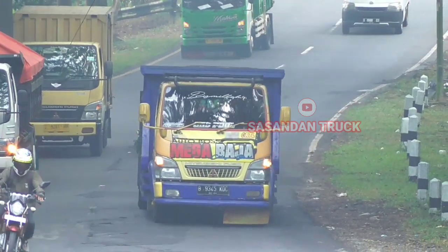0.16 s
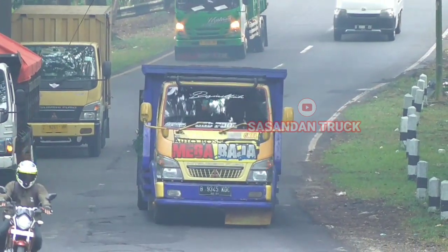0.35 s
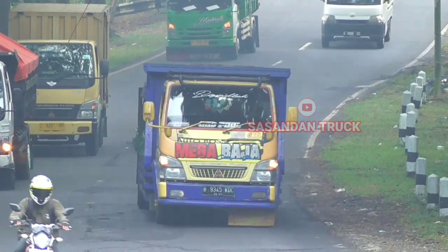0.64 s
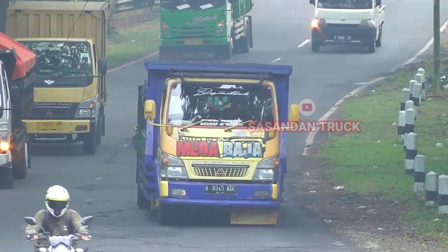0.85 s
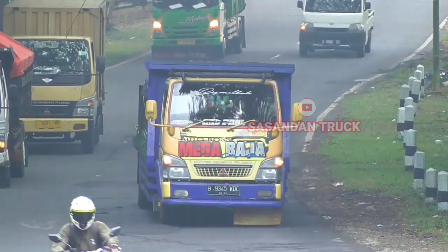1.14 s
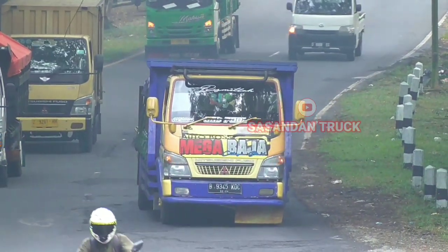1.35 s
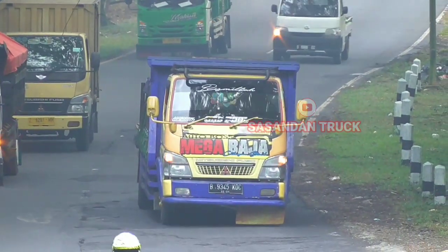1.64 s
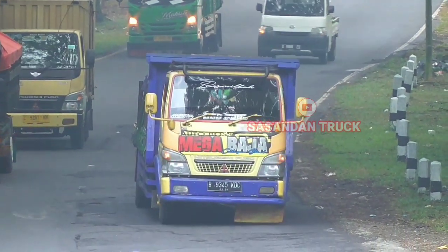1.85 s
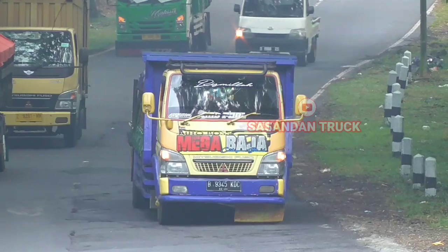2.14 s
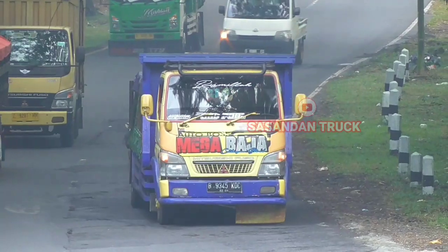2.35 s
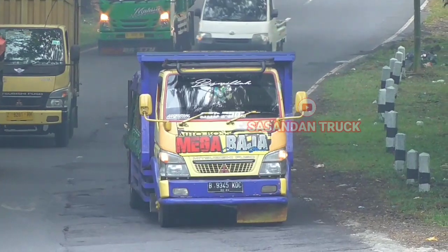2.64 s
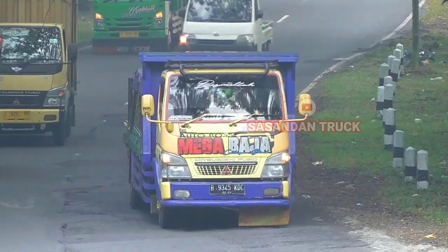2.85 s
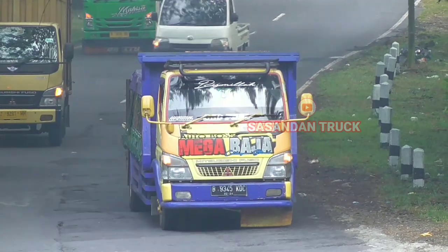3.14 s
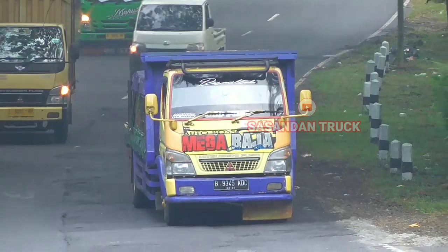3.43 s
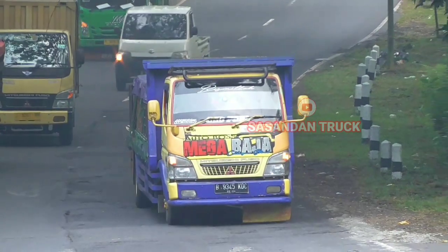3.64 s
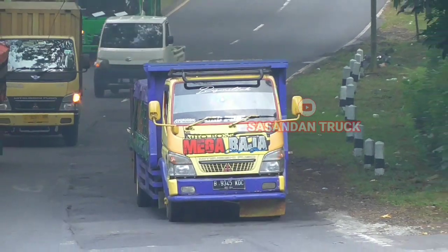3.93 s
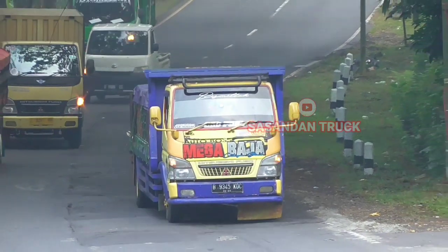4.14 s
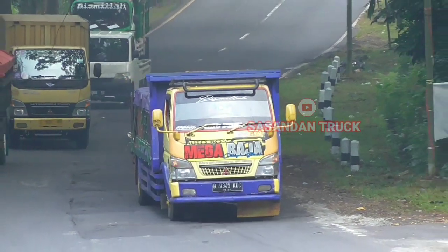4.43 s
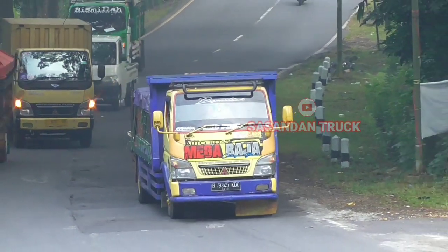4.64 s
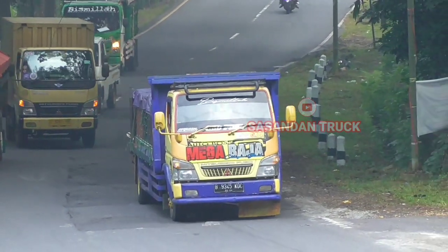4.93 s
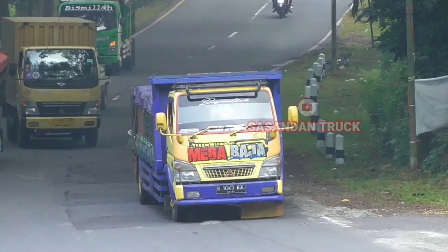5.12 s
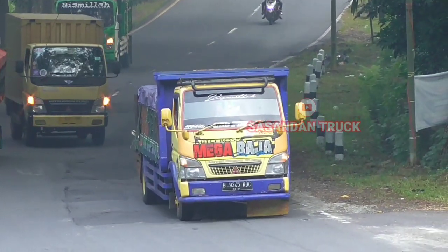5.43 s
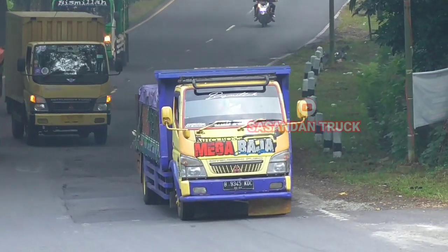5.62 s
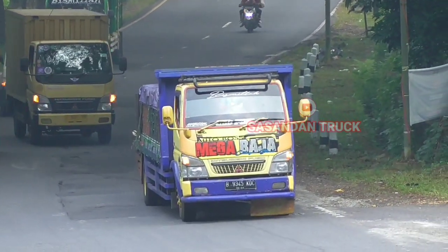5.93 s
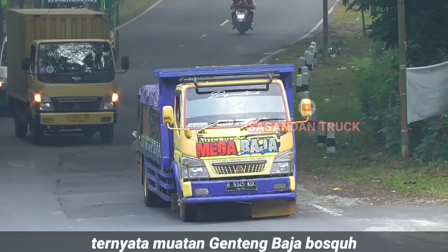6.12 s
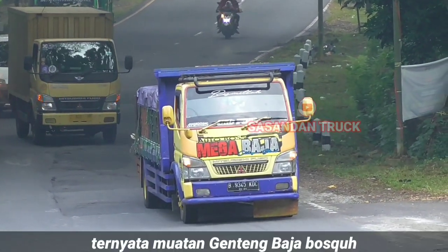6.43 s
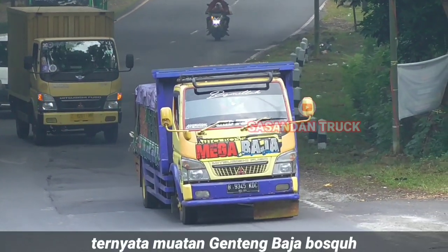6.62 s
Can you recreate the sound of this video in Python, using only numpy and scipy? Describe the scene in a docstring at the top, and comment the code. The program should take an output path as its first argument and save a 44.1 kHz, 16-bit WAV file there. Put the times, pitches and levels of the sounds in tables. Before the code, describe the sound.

Rising diesel drone and clatter from an approaching dump truck, a brief dip at the gear change, then a deep, close, straining growl.

```python
"""A loaded four-cylinder diesel dump truck climbs a hill road, shifts up a gear and labours on, lower and louder.
Additive synthesis at multiples of the firing rate makes its exhaust note and the singing upper harmonics.
Clicks and surging noise at each firing excite the silencer, block and panels; filtered noise makes rasp and hiss.
A motorbike (resonant noise) coasts by at the start; other lorries rumble behind (coloured noise and a drone).
In the roadside trees cicadas sing (resonant noise), and a cricket whines (an amplitude-modulated tone)."""
import sys
import numpy as np
from scipy import signal
from scipy.fft import rfft, irfft, next_fast_len
from scipy.io import wavfile
from scipy.ndimage import uniform_filter1d

SR = 44100
rng = np.random.default_rng(int(sys.argv[2]) if len(sys.argv) > 2 else 0)


def put_to_file(sound):
    """Save the sound as 16-bit audio at rate SR, in the file named by the first command-line argument."""
    columns = np.atleast_2d(sound).T  # one column per channel
    safe = np.clip(columns, -1, 1)
    whole_steps = np.round(safe * 32767)
    wavfile.write(sys.argv[1], SR, whole_steps.astype(np.int16))


N = 298557
TIME = np.arange(N) / SR  # s
SIZE = 2 * next_fast_len(N // 2 + 2048)  # transform length, samples
BINS = np.fft.rfftfreq(SIZE, 1 / SR)  # Hz
SIDES = np.array([[.5], [-.5]])  # halves of a left minus right difference

# closing of the throttle for the gear change: (time [s], closure [0-1])
THROTTLE_SHUT = [(3.46, 0), (3.48, 0.37), (4.15, 1), (4.26, 0.13)]


def undb(db):
    """Amplitude ratio: 20 dB is a factor of ten."""
    return 10 ** (np.asarray(db) / 20)


def curves(table):
    """Linear interpolation: each column of a table joined by straight lines in time."""
    s, *columns = np.transpose(table)
    return [np.interp(TIME, s, c) for c in columns]


def across(points):
    """Logarithmic interpolation: (Hz, value) points joined on a log-frequency axis."""
    hz, value = np.transpose(points)
    return np.interp(np.log(BINS + 1), np.log(hz), value)


def unit(x):
    """Normalization to a root-mean-square value of 1."""
    return x / np.sqrt(np.mean(x ** 2))


def through(x, response):
    """Linear filtering: the spectrum times a frequency response, then scaled to rms 1."""
    return unit(irfft(rfft(x, SIZE) * response, SIZE)[..., :N])


def resonance(hz, width):
    """Damped oscillator: a band-pass response of gain 1 at its centre."""
    return 1j * BINS * width / (hz ** 2 - BINS ** 2 + 1j * BINS * width)


def swell(s, length):
    """Gaussian envelope: a smooth rise and fall around time s, of standard deviation length."""
    return np.exp(-.5 * ((TIME - s) / length) ** 2)


def walk(rate):
    """Low-passed random steps: levels held 1 / rate s and averaged twice; rms 1."""
    hold = int(SR / rate)
    steps = rng.standard_normal(1024)[np.arange(N) // hold % 1024]
    return unit(uniform_filter1d(uniform_filter1d(steps, hold), hold))


def air(side_db):
    """Mid-side stereo: white noise, its side signal at the given level against the mid."""
    mid, side = rng.standard_normal((2, N))
    return unit(mid + undb(side_db) * side * np.array([[1], [-1]]))


def pan(x, db):
    """Interaural level difference: place a sound by its left minus right level."""
    return x * undb(SIDES * db)


def roadside(x, wet_db, t60):
    """Scattering from trees and vehicles: a decaying noise tail, different in each channel."""
    t = TIME[:SR // 2]
    tail = rng.standard_normal((2, len(t))) * undb(-60 * t / t60) * (t > .004)
    tail /= np.sqrt(np.sum(tail ** 2, axis=1, keepdims=True))
    return x + undb(wet_db) * signal.fftconvolve(x[None], tail, axes=1)[:, :N]


def knocks(cycle, jitter_s, scatter_db):
    """Impulse excitation: one click a firing, with random timing error and strength."""
    firing = np.arange(1, int(cycle[-1]))
    error, size = rng.standard_normal((len(firing), 2)).T
    at = np.clip((np.interp(firing, cycle, TIME) + jitter_s * error) * SR, 0, N - 2)
    whole, strength = at.astype(int), undb(scatter_db * size)
    # each click is shared between the two nearest samples
    first = np.bincount(whole, strength * (1 - at + whole), N)
    second = np.bincount(whole + 1, strength * (at - whole), N)
    return unit(first + second)


def puffs(cycle, depth, side_db):
    """Modulated turbulence: gas noise surges at each firing and decays until the next."""
    return unit(air(side_db) * (1 + depth * np.exp(-(cycle % 1))))


def flares(table, noise):
    """Resonant excitation: noise through two equal resonances in series rings in brief swells."""
    out = 0
    for s, length, hz, width, db in table:
        out = out + undb(db) * swell(s, length) * through(noise, resonance(hz, width) ** 2)
    return out


def exhaust(cycle, hz, db, bog):
    """Pipe resonance: harmonics of the firing rate swell and fade as the revs carry them across it."""
    # response of the exhaust pipe, relative: (frequency [Hz], gain [dB])
    pipe = [(107, 0), (110.5, -1.5), (113, -11), (122, 3), (130, -6), (138, 1.5), (152, 0), (166, 3.5),
            (180, -2), (195, 5), (207, -11), (222, -10.5), (231, 1), (252, 5.5), (275, -7), (285, -3.5),
            (303, -3.5), (330, -15), (352, -12.5), (385, -35), (425, -14), (455, -22.5), (495, -10),
            (540, -23.5)]
    # changes of harmonics 2 to 7 as the engine bogs down, where the even ones take over: (change [dB])
    bog_db = [1, -0.5, 10, -1.5, 11, 6]
    # relative weights of harmonics 2 to 7 with the throttle shut: (weight [dB])
    coast_db = [0, 0, 4.5, -5, -11.5, -19]
    note_db = 0.46  # added to the given level
    shaken = cycle + .002 * walk(30)  # uneven burning
    shut, = curves(THROTTLE_SHUT)
    gains = []
    for order, (change, coast) in enumerate(zip(bog_db, coast_db), 2):
        driven_db = (1 - shut) * np.interp(order * hz, *np.transpose(pipe))
        fading_db = 1.7 * walk(9)  # each harmonic fades on its own
        gains.append(undb(driven_db + shut * coast + bog * change + fading_db))
    gains = gains / np.linalg.norm(gains, axis=0) * undb(db + note_db)
    fundamental_db = np.interp(TIME, [3.5, 5, 6.2], [-58, -53, -47])
    # the open pipe radiates the rate of change of its flow: each crest is followed by a trough
    note = -undb(fundamental_db) * np.sin(2 * np.pi * shaken)
    for order, gain in enumerate(gains, 2):
        lag = 1.1 * (order % 2)  # the piston's push follows each blow-down and turns the odd harmonics
        paths = .12 * walk(2)  # the road's reflection slowly turns each harmonic, radians
        note = note - gain * np.sin(2 * np.pi * order * shaken - lag + paths)
    # strokes scatter in strength, more with the throttle shut
    uneven_db = (0.45 + 0.7 * shut) * walk(70)
    # every other firing is stronger, more so when the engine bogs down
    cylinder_db = (-0.3 - 0.6 * bog) * np.cos(np.pi * cycle)
    return np.sqrt(2) * note * undb(uneven_db + cylinder_db)


def chuffs():
    """Resonance of turbulent flow: short, low gusts as the throttle shuts and the clutch bites."""
    # gusts: (peak time [s], level [dB], length [s], pitch [Hz], width of each of two resonances [Hz])
    gusts = [(3.457, -24, 0.011, 215, 200), (3.505, -31, 0.022, 195, 80), (3.816, -32, 0.014, 281, 150),
             (3.89, -28, 0.022, 160, 90)]
    out = 0
    for s, db, length, hz, width in gusts:
        gust = through(rng.standard_normal(N), resonance(hz, width) ** 2)
        out = out + undb(db) * gust * swell(s, length)
    return out


def shell(cycle, db):
    """Forced vibration: the silencer shell booms with every firing."""
    # relative response of the shell: (frequency [Hz], gain [dB])
    shell_colour = [(300, -6), (380, 24), (435, 18), (500, 8), (560, 22), (640, 20.5), (760, -44)]
    blows = roadside(knocks(cycle, jitter_s=.0001, scatter_db=1.5), wet_db=-6, t60=.25)
    drive = blows + puffs(cycle, depth=2.6, side_db=-11)
    return undb(db) * through(drive, undb(across(shell_colour)))


def block():
    """Modal superposition: the resonances of block and cab add with alternating sign."""
    # modes of the block and cab: (frequency [Hz], width [Hz], gain [dB])
    modes = [(770, 45, -5), (855, 26.5, 0.5), (877, 69, -3), (1056, 111, -3.5), (1282, 122, -6.5),
             (1506, 79, -9.5), (1629, 49, -12)]
    response = 0
    for k, (hz, width, gain) in enumerate(modes):
        response = response + (-1) ** k * undb(gain) * resonance(hz, width)
    return response


def clatter(cycle, db):
    """Modal excitation: combustion knocks and rattling gear ring the block."""
    blows = roadside(knocks(cycle, jitter_s=.00009, scatter_db=4.0), wet_db=-0.5, t60=0.1)
    drive = undb(-7.5) * blows + puffs(cycle, depth=1.8, side_db=-22)
    return undb(db) * through(drive, block())


def panels(cycle):
    """Sympathetic resonance: panels of the tipper body ring as the engine shakes them."""
    # ringing panels: (peak time [s], length [s], frequency [Hz], width of each of two resonances [Hz],
    # level [dB])
    ringing = [(2.99, 0.024, 1067, 110, -29.5), (3.3, 0.065, 864, 60, -35), (3.28, 0.11, 1626, 110, -38.5),
               (4.38, 0.13, 832, 60, -33), (5, 0.027, 733, 80, -32), (5.03, 0.16, 762, 80, -33.5),
               (5.06, 0.16, 1472, 69.9, -36), (5.25, 0.043, 1130, 80, -31), (5.47, 0.034, 755, 49.9, -31),
               (5.98, 0.12, 1426, 130, -38)]
    return flares(ringing, puffs(cycle, depth=3, side_db=-24))


def singing(cycle, hz, db, bog):
    """Harmonic synthesis: clean lines at high revs, a growl at low revs whose high lines break up."""
    # upper harmonics that engine and gears favour, relative: (multiple of the firing rate [1],
    # level at high revs before a common lift [dB], level at low revs [dB])
    orders = [(8, -25, -15), (9, -20, -21), (10, -21, -19), (11, -18, -21), (12, -21, -22),
              (13, -18, -15.5), (14, -15, -12), (15, -20, -16), (17, -20, -22), (18, -21, -23),
              (20, -24, -21), (21, -19, -22), (22, -22, -27), (26, -36, -22), (27, -30, -15),
              (28, -32, -22)]
    # harmonics that sing out for a while: (multiple [1], peak time [s], length [s], lift [dB])
    lifts = [(14, 1.9, .55, 8), (9, 1.8, .55, 9), (12, 1.75, .22, 9), (17, 1.8, .4, 4), (18, 1.8, .5, 5),
             (10, 3, .3, 11), (11, 3.3, .15, 7), (10, 4.3, .17, 8), (15, 4.4, .2, 6), (9, 4.5, .22, 12),
             (8, 4.45, .15, 6), (10, 6.3, .3, 5), (13, 6.3, .4, 4), (14, 6.4, .4, 3)]
    high_revs_db = 1.5  # the common lift
    labour = np.interp(hz, [57, 70], [1, 0])
    breakup = 0.015 + labour * (0.1 - 0.015)  # roughness that each step up the harmonics adds
    shut, = curves(THROTTLE_SHUT)
    tones = 0
    for order, high_db, low_db in orders:
        rough = breakup * (order - 4)
        rate = 12 + 2 * order
        turn = 2 * np.pi * order * cycle
        broken = walk(rate) * np.cos(turn) + walk(rate) * np.sin(turn)
        tone = (np.cos(turn) + rough * broken) / np.sqrt(.5 + rough ** 2)
        lift_db = sum(lift * swell(s, length) for multiple, s, length, lift in lifts if multiple == order)
        revs_db = (1 - labour) * (high_db + high_revs_db) + labour * low_db
        fade_db = 1.6 * walk(6)  # each harmonic comes and goes
        tones = tones + tone * undb(revs_db + lift_db + fade_db)
    # stronger as the engine bogs down, weaker with the throttle shut
    return roadside(tones * undb(db + 2 * bog - 1.5 * shut), wet_db=-14, t60=0.2)


def gas(cycle, rush_db, bog):
    """Flow noise: the tailpipe's rasp, the intake's hollow ring and the hiss of charge air."""
    # relative colour of the rasp: (frequency [Hz], gain [dB])
    rasp_colour = [(1200, 0), (1900, 5.5), (2300, 3.5), (2750, 2.5), (3450, 1.5), (4400, 2.5), (5300, -1),
                   (6100, -10.5), (8000, -23)]
    # relative colour of the hiss from afar: (frequency [Hz], gain [dB])
    hiss_far = [(4000, 5), (6100, 9), (6700, 12.5), (7400, 12), (8400, 14), (9400, 12.5), (10600, 11),
                (12000, 7), (13500, 5), (15000, -23)]
    # relative colour of the hiss once the truck is near and under load: (frequency [Hz], gain [dB])
    hiss_near = [(3500, -27), (5200, 3), (6100, 4.5), (6850, 6), (7600, 5), (8400, 7), (9500, 3),
                 (11000, 2), (13000, -4.5), (15000, -19)]
    rasp = through(puffs(cycle, depth=0.25, side_db=-7), undb(across(rasp_colour)))
    jet = puffs(cycle, depth=0.7, side_db=-4.5)
    intake = undb(-9.5) * through(jet, resonance(3460, 980) ** 2)  # level against the rasp
    near = np.interp(TIME, [3.8, 4.3], [0, 1])
    far_hiss = through(jet, undb(across(hiss_far)))
    near_hiss = through(jet, undb(across(hiss_near)))
    hiss = (1 - near) * far_hiss + near * near_hiss
    # the hiss is brightest as the truck comes close
    sizzle = undb(-46) * swell(5, 0.4) * through(jet, resonance(13200, 12000) ** 2)
    flutter_db = .55 * walk(16)
    # the rasp grows more slowly than the hiss (dB per dB) and eases as the engine bogs down
    rasp_db = -4 + 0.73 * rush_db - 1.5 * bog
    rasping = undb(rasp_db) * (rasp + (1 - bog) * intake)
    hissing = undb(rush_db + 7) * hiss
    return undb(flutter_db) * (rasping + hissing + sizzle)


def turbo():
    """Frequency modulation: the turbocharger's thin whistle wavers and climbs, then sinks into the rush."""
    # whistle before its random waver: (time [s], frequency [Hz], level [dB])
    whistle = [(0, 2900, -67), (0.3, 2960, -61), (0.72, 3020, -62), (1.0, 3000, -66), (1.45, 3043, -57),
               (1.8, 3070, -60), (2.25, 3130, -57), (2.8, 3194, -73)]
    hz, db = curves(whistle)
    waver_hz, flicker_db = 34 * walk(45), 3.5 * walk(12)
    tone = np.sin(2 * np.pi * np.cumsum(hz + waver_hz) / SR)
    return undb(db) * unit(roadside(tone * undb(flicker_db), wet_db=-4, t60=0.11))


def whistles():
    """Narrow-band resonance: whistles of intake and charge air flare up."""
    # flares: (peak time [s], length [s], frequency [Hz], width of each of two resonances [Hz], level [dB])
    whistling = [(.62, 0.2, 3320, 110, -56), (1.2, 0.2, 3470, 110, -65), (1.9, 0.13, 3320, 130, -51),
                 (2.0, 0.22, 4460, 90, -55), (2.45, 0.3, 4320, 450, -51), (3.05, 0.06, 3600, 400, -42),
                 (3.46, 0.014, 8720, 220, -44), (3.652, 0.018, 10370, 110, -40.5),
                 (4.322, 0.036, 8400, 429, -37.5), (4.45, 0.25, 1900, 600, -38.5),
                 (4.9, 0.36, 6970, 419.4, -40.5)]
    return flares(whistling, air(side_db=-18))


def spread(x):
    """Decorrelation: near the truck, shifting paths from along its length widen the image."""
    # width of the truck's noise: (time [s], added side against mid [dB])
    width_table = [(0, -18), (3.5, -37), (4.6, -16), (5.2, -4), (5.6, -4), (6.2, -4.5), (6.77, -8)]
    side_db, = curves(width_table)
    mid = rfft(x.mean(axis=0), SIZE)
    side = 0
    for delay in rng.uniform(.001, .009, 6):  # s
        delayed = irfft(mid * np.exp(-2j * np.pi * BINS * delay), SIZE)[:N]
        side = side + walk(14) * delayed / np.sqrt(6)
    return x + undb(side_db) * side * np.array([[1], [-1]])


def draw_level(x):
    """Interaural phase difference: close by, the truck reaches the left channel sooner."""
    # the truck draws level with the microphone: (time [s], closeness [0-1])
    closeness = [(3.4, 0), (4.6, 0.52), (5.4, 0.94)]
    # lead of the left channel in the close signal: (frequency [Hz], phase [rad])
    near_lead = [(50, 0.2), (130, 0.44), (270, 0.48), (500, 0.88), (900, 0.55), (1500, 0.85), (3500, 1.1),
                 (8000, 1.27), (14000, 1.7)]
    near, = curves(closeness)
    shift = np.exp(1j * SIDES * across(near_lead))
    early_left = irfft(rfft(x, SIZE) * shift, SIZE)[:, :N]
    return (1 - near) * x + near * early_left


def motorbike():
    """Resonant noise: a motorbike coasts downhill at the start with a soft rasp."""
    return undb(-49.5) * swell(0.31, 0.98) * through(air(side_db=-44), resonance(1940, 580) ** 2)


def traffic():
    """Filtered noise plus a frequency-modulated tone: the queue's rumble and a lorry that drops back."""
    # the queue's rumble: (time [s], level [dB])
    rumble_level = [(0, -31.5), (3.3, -32.5), (4.4, -32), (5.2, -34.5), (6.0, -29), (6.77, -32.5)]
    # relative colour of the rumble: (frequency [Hz], gain [dB])
    traffic_colour = [(20, -36), (35, -40), (48, -16), (85, -15.5), (125, -8), (165, -2), (200, -7),
                      (245, -4.5), (310, -6.5), (390, -15.5), (900, -11.5), (3000, -82)]
    rumble_db, = curves(rumble_level)
    rumble = through(air(side_db=-17.5), undb(across(traffic_colour))) * undb(rumble_db)
    drone_hz = 122 * (1 + 0.01146 * walk(3.0))
    waver_db = 3.5 * walk(5)
    drone_db = np.interp(TIME, [0, 3, 5], [-43, -45, -52]) + waver_db
    drone = np.sqrt(2) * undb(drone_db) * np.sin(2 * np.pi * np.cumsum(drone_hz) / SR)
    return rumble + drone


def insects():
    """Amplitude modulation: wing strokes put side tones on a cricket's whine over a cicada chorus."""
    # the bush cricket's whine before its random waver: (time [s], frequency [Hz])
    cricket = [(0, 13900), (.7, 13820), (1.45, 14010), (2.55, 13790), (3.35, 14020), (4.4, 13800),
               (5.3, 14000), (6.3, 13820), (6.77, 13920)]
    chorus = through(air(side_db=-7.5), resonance(7870, 870) ** 2) * undb(-47.0 + .5 * walk(3.7))
    hz, = curves(cricket)
    stroke_hz = 235 + 8 * walk(9)
    strokes = 1 + 0.43 * np.cos(2 * np.pi * np.cumsum(stroke_hz) / SR)
    whine = strokes * np.sin(2 * np.pi * np.cumsum(hz + 18 * walk(120)) / SR)
    return pan(chorus, db=2.5) + undb(-54.0) * unit(roadside(whine, wet_db=18, t60=0.25))


def scene():
    """Superposition: one firing cycle drives all the engine's sounds; traffic and insects add to them."""
    # engine speed, with the gear change from 3.43 to 4.1 s: (time [s], firing rate [Hz])
    firing_rate = [(0.0, 68), (0.54, 69.4), (0.85, 70.9), (1.3, 72.1), (2.0, 74.2), (2.6, 76.4),
                   (2.85, 76.95), (3.05, 76.7), (3.38, 77.3), (3.44, 76), (3.475, 72.3), (3.6, 69.3),
                   (3.7, 66.06), (3.9, 58.7), (4.08, 57.7), (4.2, 56.25), (4.35, 56.15), (4.6, 55.55),
                   (4.9, 54.85), (5.05, 54.25), (5.25, 54.35), (5.6, 53.55), (6.1, 53.1), (6.3, 53.45),
                   (6.42, 53.2), (6.6, 54), (6.77, 53.5)]
    # exhaust note at the verge: (time [s], level before a small trim [dB])
    loudness = [(0.0, -31.5), (1.19, -29), (1.87, -26), (2.36, -28.5), (2.47, -25), (3.24, -22.5),
                (3.44, -21.5), (3.475, -28), (3.55, -27), (3.61, -24), (3.68, -26), (3.77, -23), (3.9, -26),
                (3.95, -30.5), (4.13, -22), (4.2, -20.5), (4.3, -17), (4.73, -16.5), (4.84, -18.5),
                (4.96, -16.5), (5.5, -16.5), (5.75, -19), (5.93, -16.5), (6.2, -18), (6.43, -22.5),
                (6.56, -20.5), (6.77, -22.5)]
    # silencer's boom: (time [s], level before a trim [dB])
    boom = [(0.0, -48), (0.11, -64), (1.98, -42), (2.73, -54), (4.02, -42), (4.43, -34.5), (5.19, -42),
            (5.39, -36), (5.69, -41), (5.79, -36.5), (6.71, -27.5), (6.77, -27)]
    # engine effort, before trims: (time [s], combustion clatter [dB], rush of gas and air [dB])
    effort = [(0.0, -41, -58.5), (0.07, -37.5, -59.5), (1.26, -34.5, -57), (2.02, -31.5, -51.5),
              (2.32, -31.5, -52), (3.36, -27, -43.5), (3.6, -31.5, -47.5), (3.64, -29.5, -45.5),
              (3.9, -30, -46), (4.32, -27, -39), (4.73, -26.5, -39.5), (5.19, -27.5, -42),
              (5.71, -30, -42.5), (6.43, -31.5, -43.5), (6.62, -30.5, -49), (6.77, -32.5, -47.5)]
    # the truck's bearing: (time [s], left minus right [dB])
    bearing = [(0, -4), (3.5, -1.5), (4.5, -0.3), (5.15, 3.5), (5.6, 4), (6.2, 1), (6.77, 1)]
    hz, = curves(firing_rate)
    note_db, = curves(loudness)
    boom_db, = curves(boom)
    effort_db, rush_db = curves(effort)
    pan_db, = curves(bearing)
    cycle = np.cumsum(hz) / SR  # firings so far
    bog = np.clip((TIME - 5.38) / 0.65 + .5, 0, 1)  # the engine bogs down at its lowest revs
    note = roadside(exhaust(cycle, hz, note_db, bog) + chuffs(), wet_db=-21, t60=.12)
    knocking = shell(cycle, boom_db - 5.5) + clatter(cycle, effort_db - 3.5)
    engine = knocking + panels(cycle) + singing(cycle, hz, effort_db - 1.5, bog)
    rush = gas(cycle, rush_db, bog) + turbo() + whistles()
    # the deep note and the rush follow only a share of the truck's bearing
    placed_note = pan(note, -0.5 + 0.16 * pan_db)
    placed_noise = spread(pan(engine, pan_db) + pan(rush, 0.57 * pan_db))
    return draw_level(placed_note + placed_noise) + traffic() + motorbike() + insects()


def record(dry):
    """Transfer functions: the channels differ in gain and phase; a low-pass cuts the top."""
    # gain of the two microphone channels: (frequency [Hz], left minus right [dB])
    balance = [(30, -1), (60, 0), (110, -1.1), (200, 0.7), (380, 0.5), (690, 2), (1280, 1.3), (2400, 0.5),
               (8000, 1.5), (14000, -1)]
    # phase by which the left leads: (frequency [Hz], phase [rad])
    lead = [(30, 0.7), (130, 0.43), (270, 0.3), (500, 0.52), (900, 0.32), (1500, 0.05), (3000, 0.16),
            (14000, 0.55)]
    ports = undb(SIDES * across(balance)) * np.exp(1j * SIDES * across(lead))
    heard = irfft(rfft(dry, SIZE) * ports, SIZE)[:, :N]
    low_pass = signal.ellip(10, .2, 80, 15100, fs=SR, output="sos")  # ripple dB, stop dB, edge Hz
    return signal.sosfilt(low_pass, heard)


dry = scene()
out = record(dry)
put_to_file(out)
```